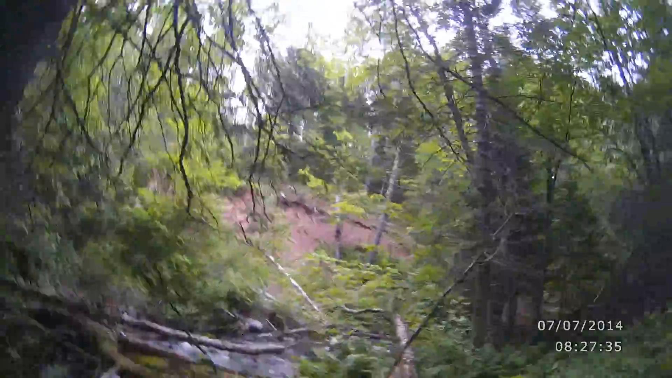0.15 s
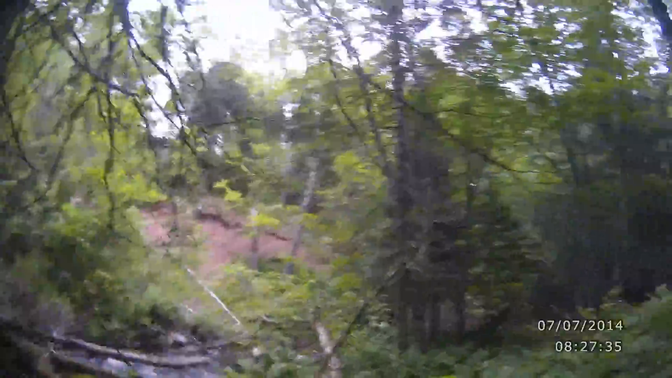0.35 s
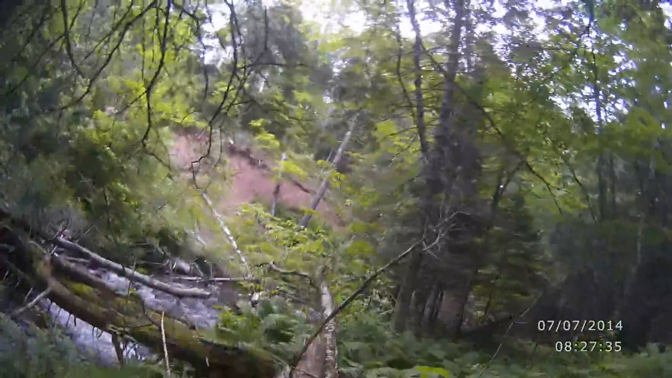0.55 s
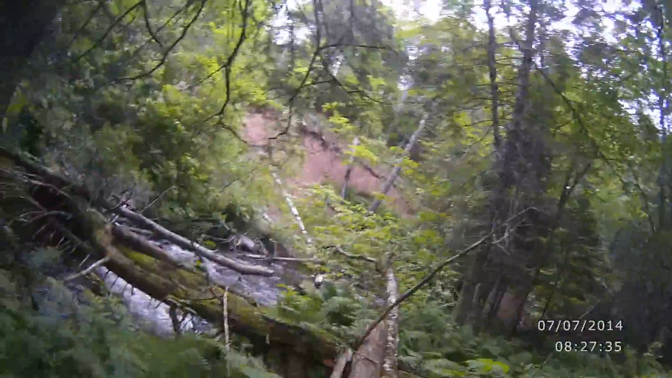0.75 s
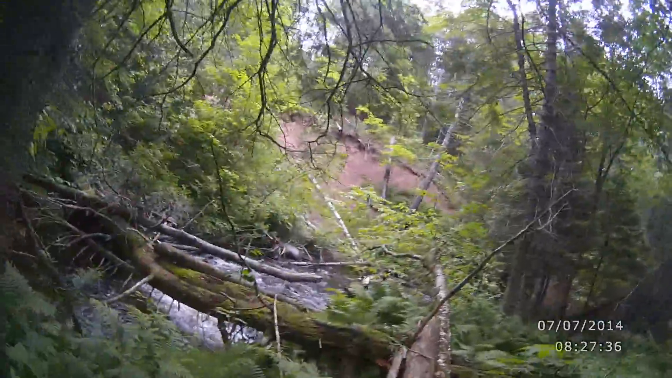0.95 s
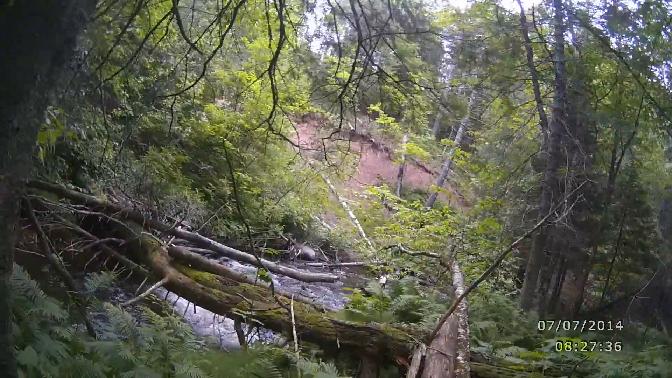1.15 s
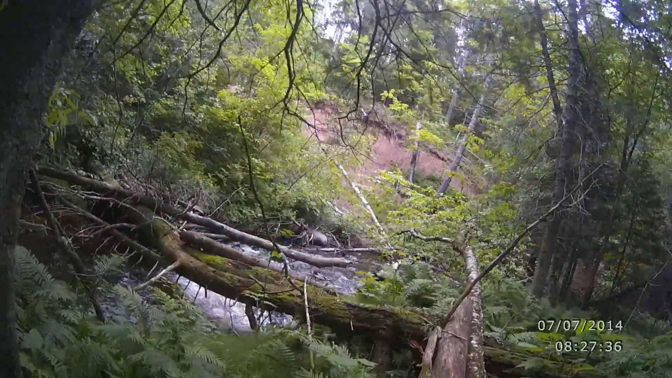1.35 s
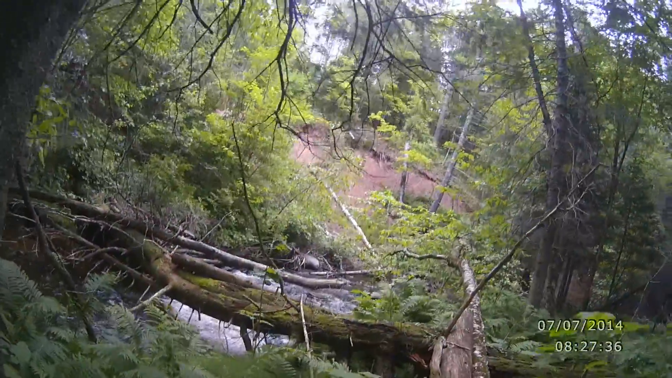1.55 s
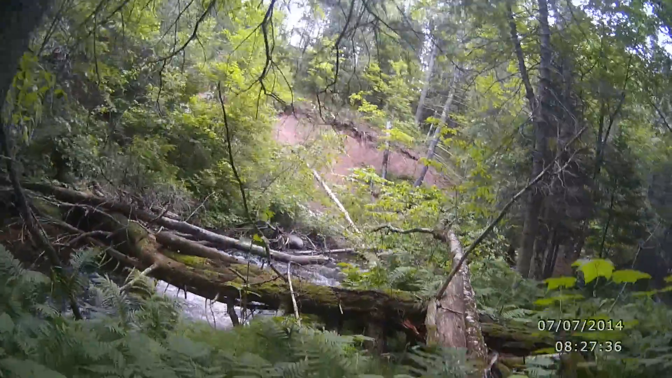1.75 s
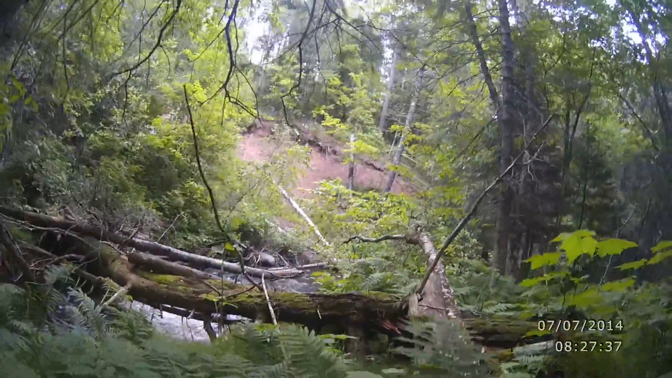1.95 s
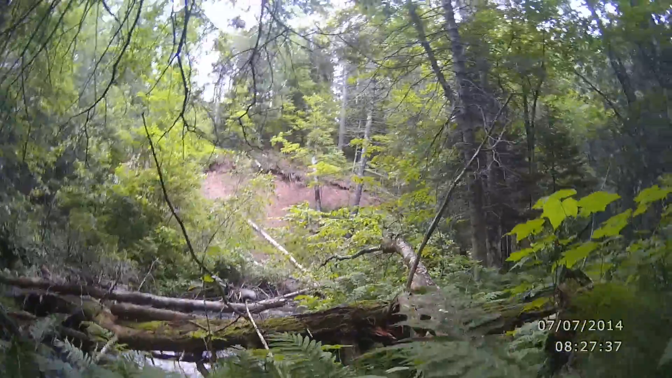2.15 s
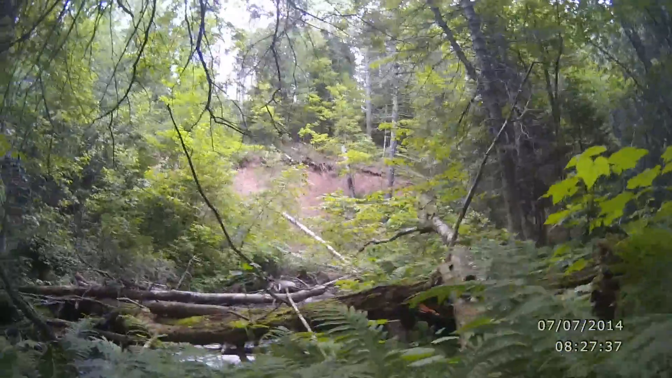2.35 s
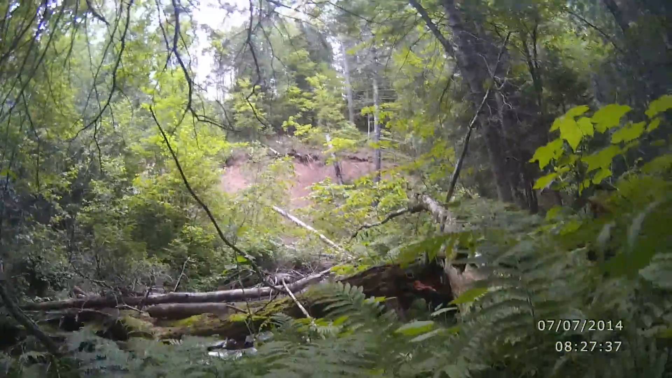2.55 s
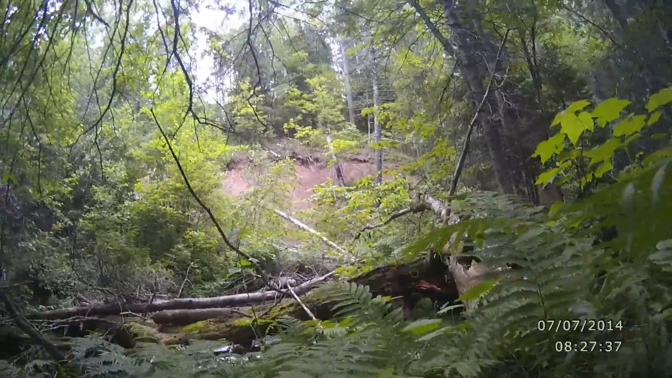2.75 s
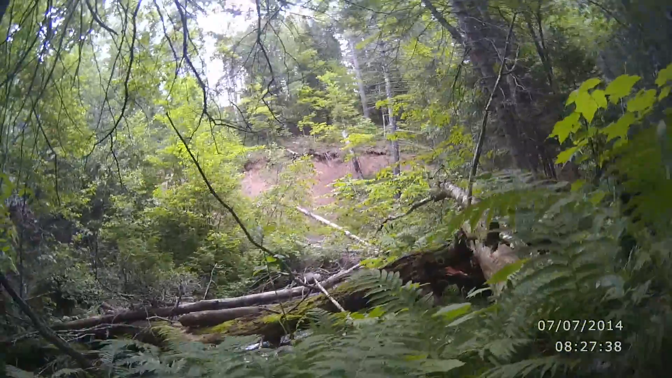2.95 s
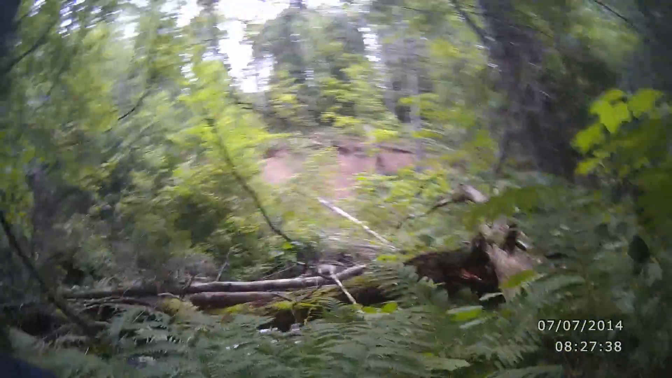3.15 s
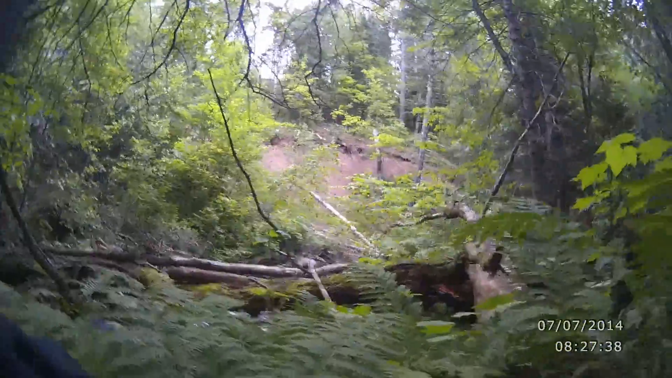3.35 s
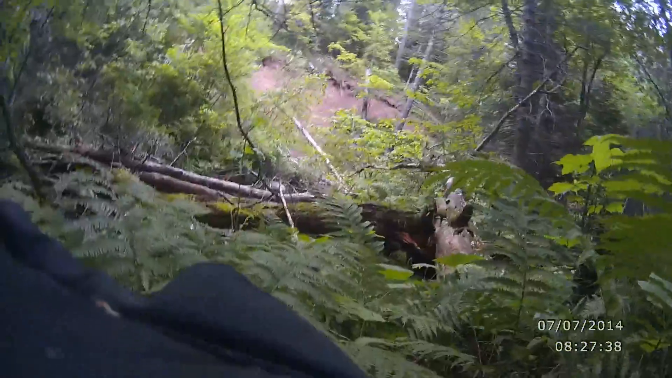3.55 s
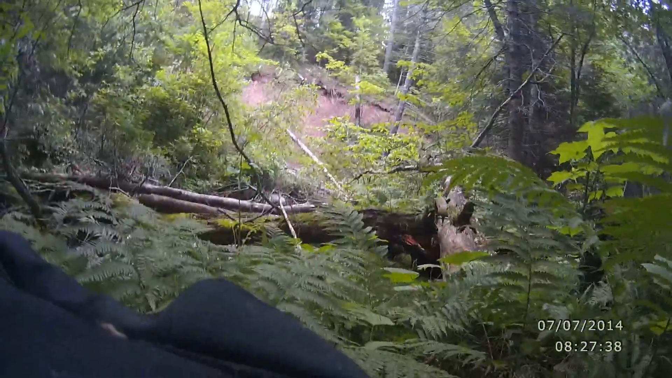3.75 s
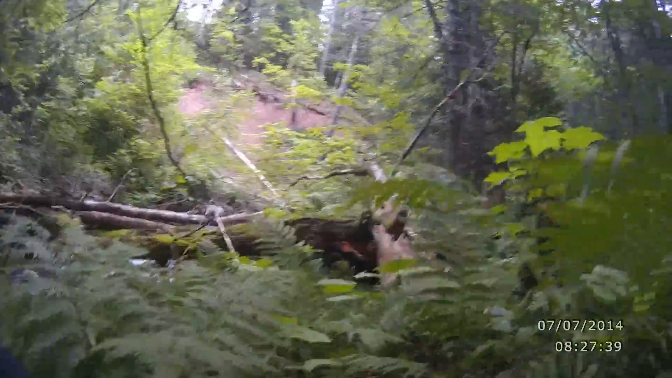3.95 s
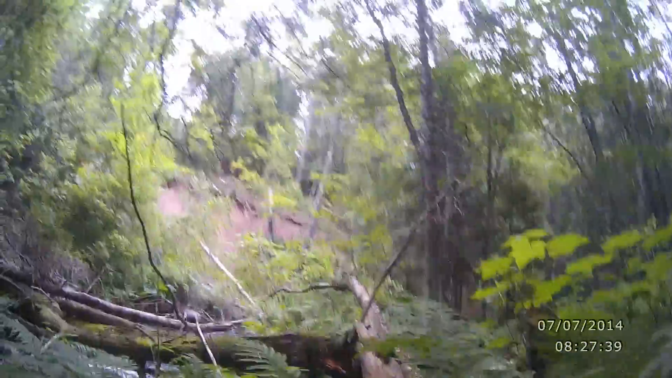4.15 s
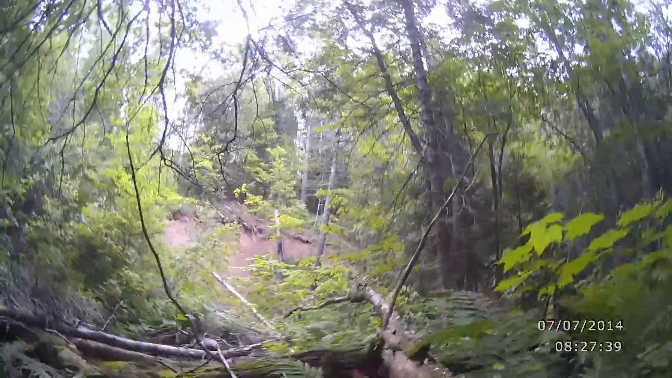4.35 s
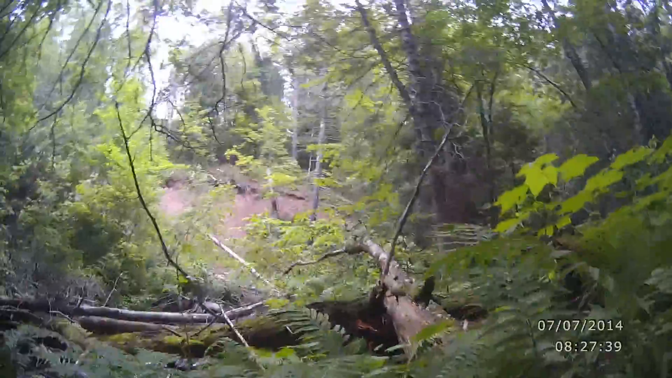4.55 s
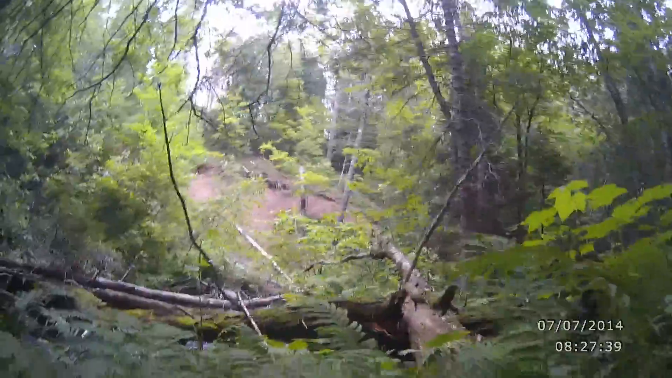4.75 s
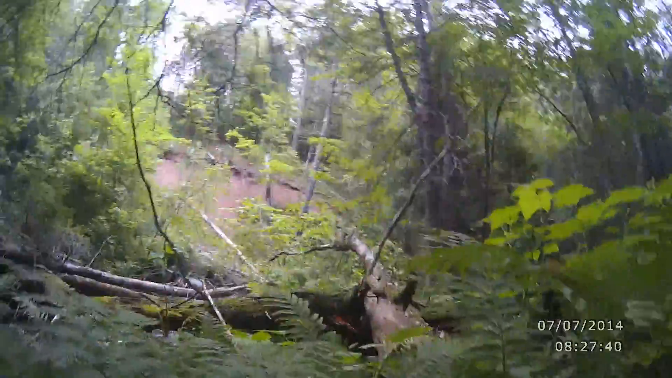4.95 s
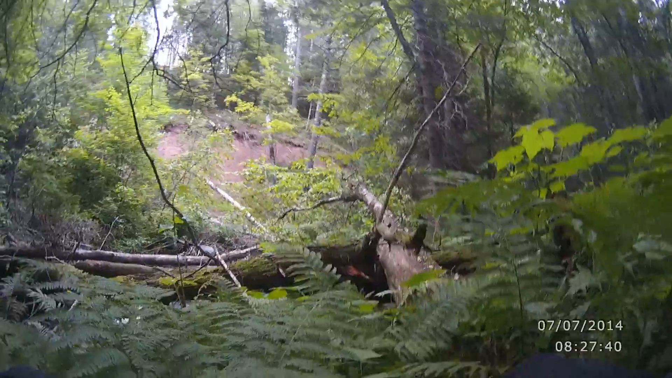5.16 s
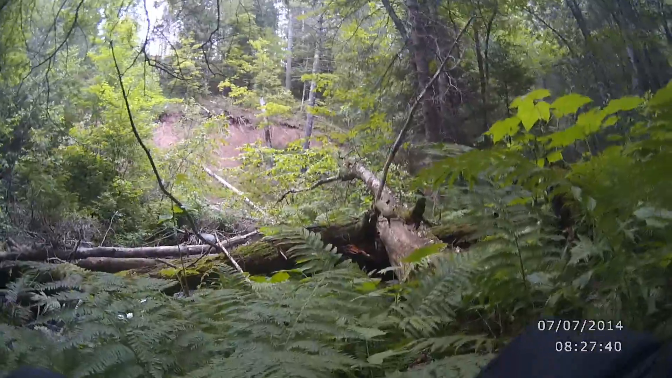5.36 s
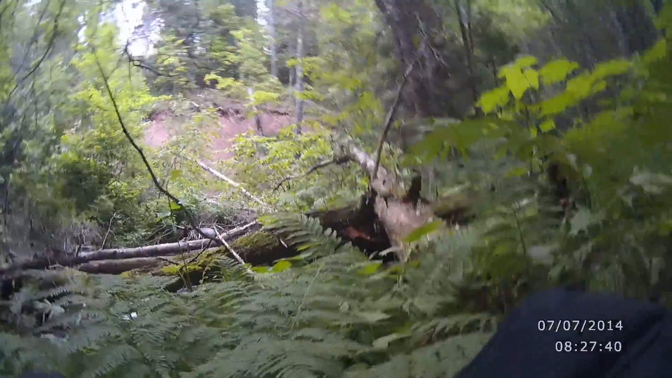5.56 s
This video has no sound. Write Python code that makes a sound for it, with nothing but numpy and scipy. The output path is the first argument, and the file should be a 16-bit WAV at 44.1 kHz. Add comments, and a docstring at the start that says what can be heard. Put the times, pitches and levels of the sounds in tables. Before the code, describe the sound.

Heard from the bank through a handheld camera's microphone, a woodland creek grows into an even, bubbling, hissing rush. Tiny ticks come from the plastic case, followed by a sharp click and a few knocks with dull rubbing of the hand. Toward the end, a quick run of knocks leads to a very close rattle that briefly overloads the microphone. The water then carries on alone.

```python
"""A wooded ravine, beside a small creek rushing over stones and fallen logs; one small handheld camera mic.
Bubbles gurgle, splash and hiss, near ones over a blur of far ones; the rush fades up over the first 1.3 s,
then holds steady. Right at the mic, hand and sleeve rub and bump the plastic case, which ticks, knocks
and once rattles hard enough to overload it. The gain control ducks the water and lets it back up."""
import sys
import numpy as np
from scipy import signal
from scipy.fft import rfft, irfft, next_fast_len
from scipy.io import wavfile
from scipy.ndimage import uniform_filter1d, map_coordinates

SR = 44100
rng = np.random.default_rng(int(sys.argv[2]) if len(sys.argv) > 2 else 0)


def transcribe(signal):
    """Save signal, clipped to [-1, 1], as a 16-bit WAV file at the path in sys.argv[1]."""
    frames = np.atleast_2d(signal).T
    limited = np.clip(frames, -1, 1)
    pcm = np.round(limited * 32767).astype(np.int16)
    wavfile.write(sys.argv[1], SR, pcm)


N = 247401


def amp(db):
    """Decibels to gain."""
    return 10 ** (np.asarray(db) / 20)


def unit(x):
    """Scale to rms 1."""
    return x / np.sqrt(np.mean(x ** 2) + 1e-20)


def curves(rows):
    """One value per sample for each column after the time."""
    times, *columns = np.transpose(rows)
    return [np.interp(np.arange(N) / SR, times, column) for column in columns]


def wobble(rate):
    """A smooth random curve, rate knots a second."""
    knots = rng.standard_normal(int(N * rate / SR) + 4)
    return map_coordinates(knots, [np.arange(N) * rate / SR])


def filtered(x, response):
    """x through a response given as a function of frequency."""
    size = next_fast_len(N + 8192)
    return irfft(rfft(x, size) * response(np.fft.rfftfreq(size, 1 / SR)), size)[:N]


def coloured(x, points):
    """x through (frequency [Hz], gain [dB]) points joined on a log axis."""
    point_hz, db = np.transpose(points)
    return filtered(x, lambda hz: amp(np.interp(np.log(hz + 1), np.log(point_hz), db)))


def reflected(x, path, low_hz, high_hz, order=8):
    """x plus a moving echo of one band: a comb that slides with the delay."""
    delay, strength = curves(path)
    band = filtered(x, lambda hz: 1 / (1 + (hz / high_hz) ** order) / (1 + (low_hz / (hz + 1)) ** 8))
    return x + strength * np.interp(np.arange(N) - delay * SR, np.arange(N), band)


def add(track, s, sound):
    """Mix a sound into the track at s seconds."""
    part = track[round(s * SR):][:len(sound)]
    part += sound[:len(part)]


def bubbles(low_hz, high_hz, cycles, spread_db, rise, count, samples):
    """Air pockets of random size ring briefly, rising in pitch as they near the surface."""
    when, pitch, chance = rng.random((count, 3)).T[:, :, None]
    hz = low_hz * (high_hz / low_hz) ** pitch
    age = hz * np.arange(samples) / SR / cycles  # 1 = rung out
    ring = np.sin(2 * np.pi * cycles * age * (1 + rise * age / 2)) * amp(-60 * age)
    gain = amp(-spread_db * np.log(np.maximum(chance, .01))) * hz  # equal power per Hz
    at = (when * N).astype(int) + np.arange(samples)
    return unit(np.bincount(at.ravel(), (gain * ring).ravel(), N)[:N])


def water(near, spectrum, near_db, surge_db):
    """Bubbles near the mic stand on the blur of countless far ones; the whole surges a little."""
    blur = unit(coloured(rng.standard_normal(N), spectrum))
    mix = unit(blur + amp(near_db) * unit(coloured(near, spectrum)))
    return mix * amp(surge_db * (wobble(5.07) + wobble(16)))


# The creek from the bank, fading up at the mic, steady after the last point: (time [s], level [dB])
CREEK_LEVEL = [(0.1, -43.5), (0.55, -40), (0.92, -36.5), (1.12, -35.5), (1.3, -33), (1.53, -32.6),
               (1.72, -33.5), (2.8, -34), (3.6, -33.5), (4.4, -33.5)]
# Tone of the gurgle under the logs: (frequency [Hz], relative level [dB])
GURGLE_SPECTRUM = [(25, -41), (60, -35), (110, -20), (180, -7), (320, 1), (450, 0), (650, -8), (1200, -47),
                   (3000, -80)]
# Tone of the splash on the stones: (frequency [Hz], relative level [dB])
SPLASH_SPECTRUM = [(30, -32), (100, -48), (200, -35), (400, -17.5), (600, -2), (850, -0.5), (1200, -2),
                   (1500, -3.5), (2100, -4.5), (3000, -8), (4500, -26.5), (9000, -76)]
# Tone of the spray above the water: (frequency [Hz], relative level [dB])
SPRAY_SPECTRUM = [(100, -57), (1000, -26), (2500, -5.5), (3500, -0.5), (4700, -1), (6000, -2.5),
                  (6700, -5.5), (7500, -3.5), (8700, 0), (9500, -2.5), (10700, -9.5), (12000, -11),
                  (13000, -14), (15000, -20)]
def creek():
    """Large pockets gurgle under the logs, smaller ones splash on stones, and spray hisses above them."""
    flow_db, = curves(CREEK_LEVEL)
    # while the rush is still quiet, gurgle and spray are a little weaker against the splash
    swell_db = flow_db - flow_db[-1]
    large = bubbles(160, 765, cycles=20, spread_db=-1, rise=0.33, count=700, samples=3000)
    middle = bubbles(461, 3650, cycles=30, spread_db=2.5, rise=0.2, count=3200, samples=1400)
    fine = bubbles(3300, 14000, cycles=5.8, spread_db=7, rise=0.1, count=16000, samples=100)
    gurgle = amp(-12 + 0.044 * swell_db) * water(large, GURGLE_SPECTRUM, near_db=-2.5, surge_db=0.5)
    splash = amp(-1) * water(middle, SPLASH_SPECTRUM, near_db=-5, surge_db=0.58)
    spray = amp(-3 + 0.11 * swell_db) * water(fine, SPRAY_SPECTRUM, near_db=-12.5, surge_db=0.5)
    return amp(flow_db) * (gurgle + splash + spray)


# Bounce off the ground below the moving mic: (time [s], delay [s], strength [0-1])
GROUND_ECHO = [(0.27, 0.0016, 0.44), (0.67, 0.0016, 0.43), (1.1, 0.0017, 0.65), (1.5, 0.0018, 0.39),
               (2.2, 0.0024, 0.1), (3.3, 0.0021, 0.18), (4.4, 0.00195, 0.26), (5.3, 0.0019, 0.19)]
def ground(rush):
    """Soft earth sends the rush up to the mic a moment later, ever less of it toward the treble."""
    return reflected(rush, GROUND_ECHO, low_hz=120, high_hz=1220, order=3)


# Tiny hard ticks of the case, right at the mic: (time [s], level [dB], pitch [Hz])
CASE_TICKS = [(1.0417, -19, 10800), (1.3175, -26, 12300), (1.498, -32, 11500), (4.7484, -16, 9350),
              (4.7665, -16, 9350), (4.9489, -1.5, 9350), (4.96, -7, 9350), (4.967, -16, 9350)]
def ticks(t60=0.0033, crack_db=-6):
    """Hard edges click together: one high, very short ring with a crack."""
    track, t = np.zeros(N), np.arange(SR // 50) / SR
    for s, db, hz in CASE_TICKS:
        band = signal.butter(2, [hz * .65, hz * 1.2], "band", fs=SR)
        crack = amp(crack_db) * signal.lfilter(*band, rng.standard_normal(len(t)))
        ring = np.sin(2 * np.pi * hz * t)
        add(track, s, amp(db - 60 * t / t60) * (ring + crack))
    return track


# Soft bumps of the hand, carried through the body to the mic: (time [s], drive level [dB], pitch [Hz])
HAND_BUMPS = [(1.679, -43, 62), (1.715, -44, 70), (1.77, -54, 60), (2.4307, -7, 516), (3.314, -41, 84),
              (3.553, -35, 123), (3.890, -34, 70), (4.575, -42, 75), (4.7466, -10, 168), (4.953, -12, 133),
              (4.974, -12, 278)]
def bumps(decay_cycles=5.2):
    """The soft hand pushes the whole camera: a few low cycles each time, with no net displacement."""
    track, t = np.zeros(N), np.arange(SR // 2) / SR
    for s, db, hz in HAND_BUMPS:
        envelope = amp(db - 60 * t * hz / decay_cycles) * (1 - np.exp(-2 * hz * t))
        sway = envelope * np.sin(2 * np.pi * hz * t)
        low_cut = signal.butter(1, hz / 2, "high", fs=SR)
        add(track, s, signal.lfilter(*low_cut, sway))
    return track


# Modes of the hollow plastic case around the mic: (frequency [Hz], relative level [dB], t60 [s])
CASE_MODES = [(275, 1, 0.12), (430, -2, 0.1), (610, -1.5, 0.084), (707, -4, 0.053), (855, 0, 0.049),
              (992, -3.5, 0.059), (1232, 5, 0.051), (1460, -11, 0.038), (1630, 4, 0.074), (1892, 6.5, 0.06),
              (2085, -3, 0.064), (2186, -5, 0.057), (2530, 6, 0.031), (4717, -1, 0.076)]
def contact(hz, cycles, top_hz, ring_db, rise_cycles=0.53, crack_cycles=30, crack_db=-6):
    """One contact on the case, peak 1: a few quick cycles, a crack and the ring of the plastic."""
    t = np.arange(SR // 6) / SR
    envelope = amp(-60 * t * hz / cycles) * (1 - np.exp(-t * hz / rise_cycles))
    push = envelope * np.sin(2 * np.pi * hz * t)
    ring = sum((-1) ** k * amp(db + rng.normal(0, 1.36) - 60 * t / t60) * np.sin(2 * np.pi * mode_hz * t)
               for k, (mode_hz, db, t60) in enumerate(CASE_MODES))
    crack = amp(crack_db - 60 * t * hz / crack_cycles) * rng.standard_normal(len(t))
    low_cut = signal.butter(2, hz / 2.82, "high", fs=SR)  # the small case radiates no bass
    high_cut = signal.butter(3, top_hz, fs=SR)  # the contact time limits the treble
    radiated = signal.lfilter(*low_cut, push + crack + amp(ring_db) * ring)
    blow = signal.lfilter(*high_cut, radiated)
    return blow / np.abs(blow).max()


# Knocks on the case, right at the mic, bunching into a hard rattle near 4.95 s:
# (time [s], peak [dB], pitch [Hz], length [cycles], treble limit [Hz], ring [dB], loss per rebound [dB])
CASE_KNOCKS = [(2.409, -15, 3740, 5, 6500, -33, 17), (2.4309, -10, 2000, 9.6, 3200, -35, 26),
               (3.1057, -15.5, 845, 18, 1400, -33, 22), (3.1122, -22.5, 890, 16, 1800, -30, 16),
               (3.127, -21, 696, 12, 1400, -26, 17), (3.1697, -23, 990, 26, 3000, -24, 12),
               (4.009, -22, 1700, 11, 2500, -26, 15), (4.5868, -19, 1650, 10, 2400, -23, 18),
               (4.588, -15, 1100, 7, 2000, -24.5, 13.5), (4.6435, -23, 1400, 16, 2300, -24, 8),
               (4.701, -12, 1910, 17, 2300, -23, 4), (4.703, -13, 1250, 20, 2000, -24, 12),
               (4.7125, -18, 1260, 16, 2200, -27, 8), (4.7503, -7.5, 1300, 16, 4000, -19.5, 20),
               (4.758, -16, 1800, 16, 2600, -23, 9), (4.934, -18, 800, 20, 2200, -19, 7),
               (4.945, -13, 1450, 14, 2400, -22, 14), (4.951, 8, 1770, 11, 3200, -22.5, 24),
               (4.9524, 2.5, 2440, 14, 3800, -26, 24), (4.9587, 7, 1840, 11, 3080, -21, 18),
               (4.962, 4, 2130, 10, 3070, -23, 24), (4.9665, -1.5, 2310, 4.9, 3500, -20, 22),
               (4.9692, -11, 1700, 13, 2500, -17, 11), (4.974, -8, 2200, 5.8, 3200, -22, 10),
               (4.978, -6.5, 1650, 14, 2600, -23, 12), (4.988, -18, 1600, 13, 2200, -21, 16)]
def knocks(contacts=6, rebound_s=0.0072, scatter_s=0.00057, pitch_ratio=0.834):
    """Each knock rebounds at a nearly even pace, weaker and duller every time."""
    track = np.zeros(N)
    for s, db, hz, cycles, top_hz, ring_db, loss_db in CASE_KNOCKS:
        for k in range(contacts):
            late = k * rebound_s + (k > 0) * scatter_s * rng.standard_normal()
            softer = pitch_ratio ** k  # a weaker rebound is a softer, lower contact
            blow = contact(hz * softer, cycles, top_hz * softer, ring_db)
            add(track, s + late, amp(db - k * loss_db) * blow)
    return track


# The hand sliding on the case beside the mic: (middle time [s], half length [s], level [dB])
HAND_RUBS = [(3.04, 0.059, -41), (3.108, 0.017, -32.5), (3.172, 0.016, -34), (4.003, 0.018, -32.5),
             (4.95, 0.037, -28.5)]
def rubs(centre_hz=880, width_hz=330):
    """Skin drags on the plastic: a dull scrape that swells and fades around the contacts."""
    t = np.arange(N) / SR
    resonance = lambda hz: hz * width_hz / (centre_hz ** 2 - hz ** 2 + 1j * hz * width_hz)
    scrape = unit(filtered(rng.standard_normal(N), resonance))
    swells = sum(amp(db) * np.exp(-((t - s) / half) ** 2) for s, half, db in HAND_RUBS)
    return scrape * swells


# Colour of the water with a sleeve close to the mic: (frequency [Hz], relative gain [dB])
SLEEVE_COLOUR = [(700, 1.5), (1000, 1.5), (1500, 2), (2400, 1.5), (2900, -2), (3400, 2), (3900, 1),
                 (4400, 4.5), (5500, 3), (6500, 2.5), (7200, 2.5), (9000, 1)]
# Bounce off the sleeve into the mic as the arm moves: (time [s], delay [s], strength [0-1])
SLEEVE_BOUNCE = [(3.7, .0014, 0.1), (4.3, 0.0015, 0.15), (4.8, 0.0013, 0.2), (5.15, 0.0012, 0.45),
                 (5.6, 0.00122, 0.3)]
def sleeve(rush, from_s=4.44, approach_s=0.84, least_close=0.28, shade_db=-0.5):
    """Closing in on the mic, the sleeve colours the rush; its echo carves shifting upper-mid hollows."""
    close = np.clip((np.arange(N) / SR - from_s) / approach_s, least_close, 1)
    tinted = (1 - close) * rush + close * amp(shade_db) * coloured(rush, SLEEVE_COLOUR)
    return reflected(tinted, SLEEVE_BOUNCE, low_hz=2620, high_hz=4250)


def scene():
    """The creek and the close handling reach one mic, the same on both channels."""
    rush = sleeve(ground(creek()))
    return np.tile(rush + knocks() + ticks() + rubs() + bumps(), (2, 1))


def gain_control(x, half_duck_rms=0.22, depth_db=4, release_s=0.31):
    """A loud passage at the mic ducks the gain, which then creeps back."""
    rms = np.sqrt(np.abs(uniform_filter1d(x ** 2, SR // 100)))
    duck = np.clip(rms / half_duck_rms - 0.5, 0, 1)
    age = np.arange(N) / SR / release_s
    held = np.exp(np.maximum.accumulate(np.log(duck + 1e-9) + age) - age)  # each peak decays slowly
    return x * amp(-depth_db * held)


def record(dry, notch_hz=7910, notch_width_hz=540, start_s=0.07, ceiling=0.72, top_hz=15200):
    """The camera mic has a notch and a band limit; it starts up, then ducks and clips on hard blows."""
    notch = lambda hz: (hz - notch_hz) ** 2 / ((hz - notch_hz) ** 2 + (notch_width_hz / 2) ** 2)
    awake = np.clip((np.arange(N) / SR - start_s) / 0.0096, 0, 1)
    ducked = gain_control(filtered(dry[0], notch)) * awake
    clipped = ducked / (1 + (ducked / ceiling) ** 12) ** (1 / 12)
    return np.tile(filtered(clipped, lambda hz: hz < top_hz), (2, 1))


dry = scene()
out = record(dry)
transcribe(out)
```